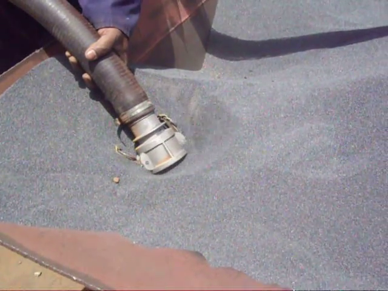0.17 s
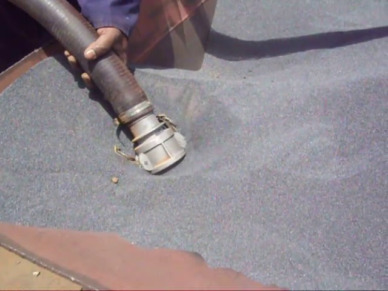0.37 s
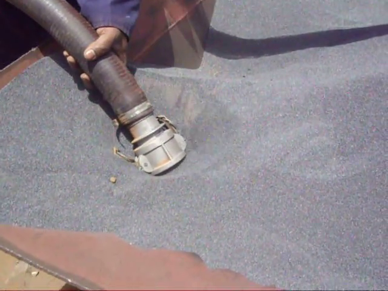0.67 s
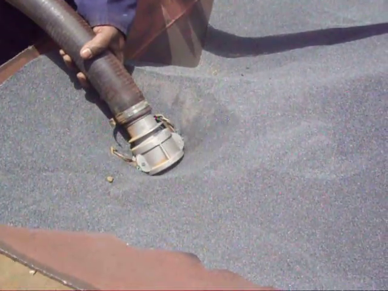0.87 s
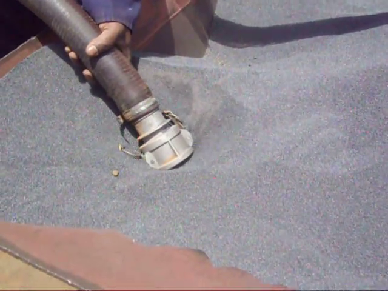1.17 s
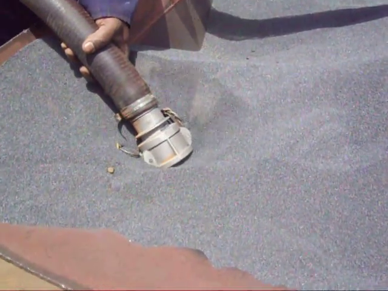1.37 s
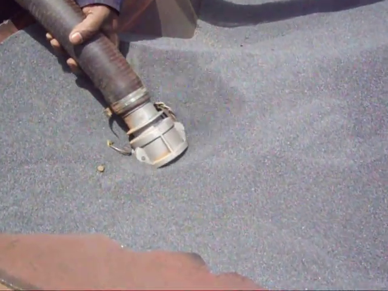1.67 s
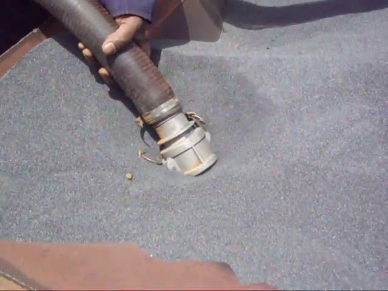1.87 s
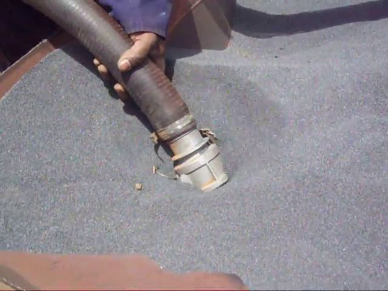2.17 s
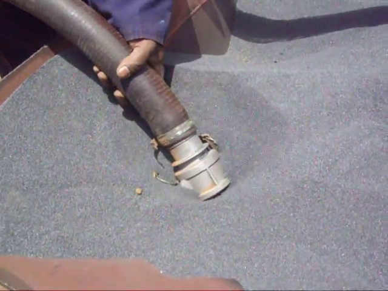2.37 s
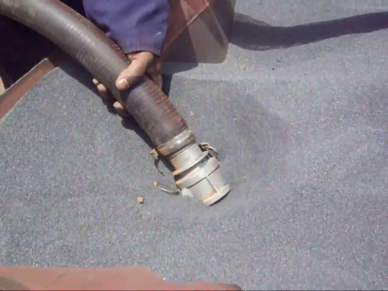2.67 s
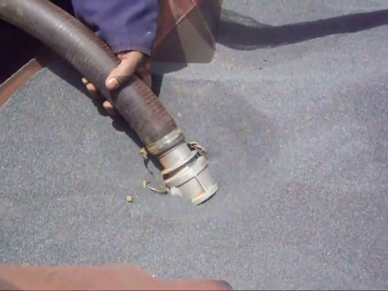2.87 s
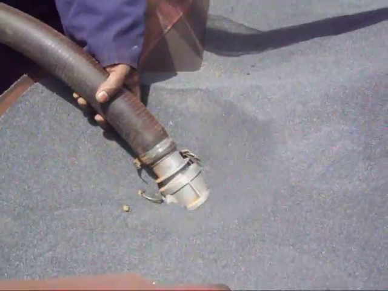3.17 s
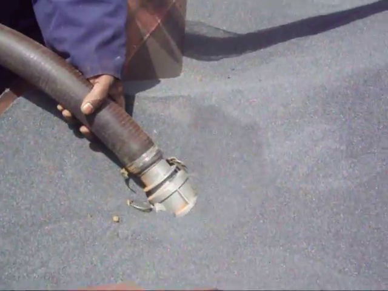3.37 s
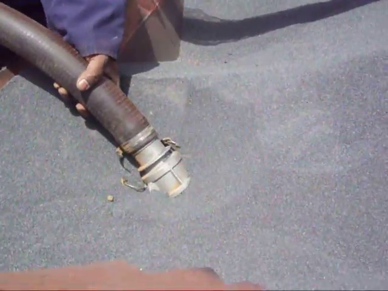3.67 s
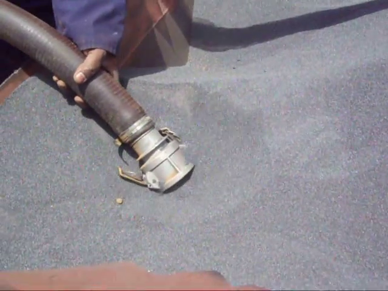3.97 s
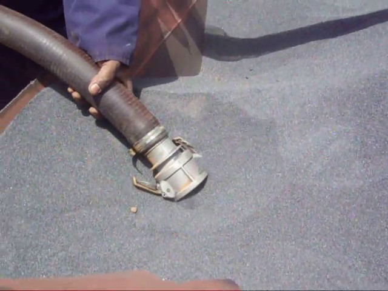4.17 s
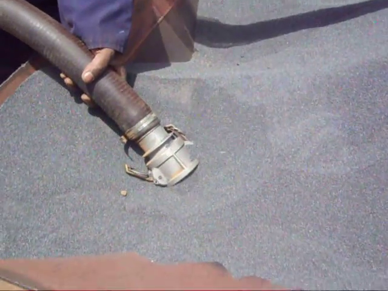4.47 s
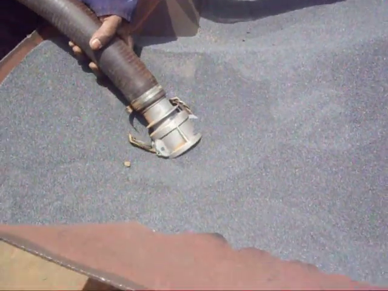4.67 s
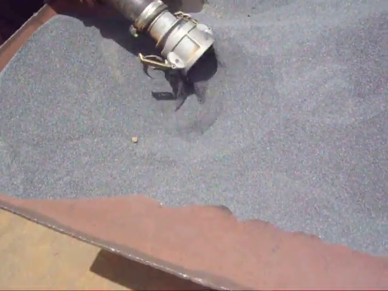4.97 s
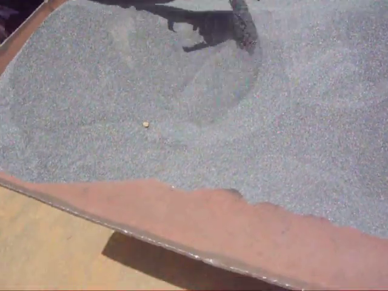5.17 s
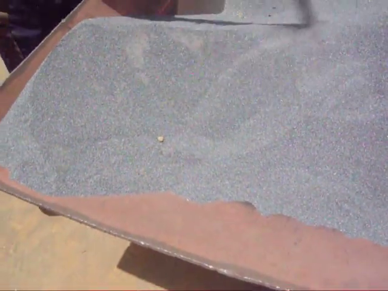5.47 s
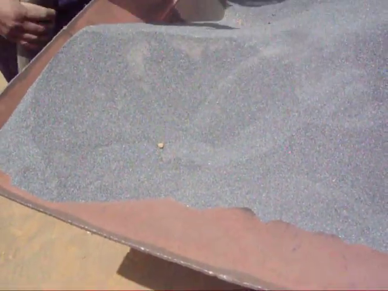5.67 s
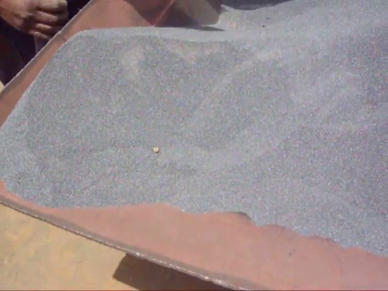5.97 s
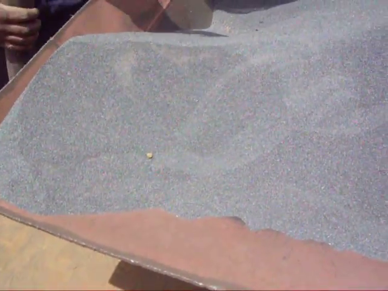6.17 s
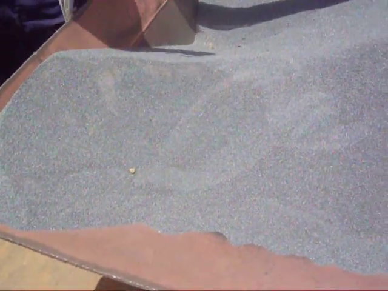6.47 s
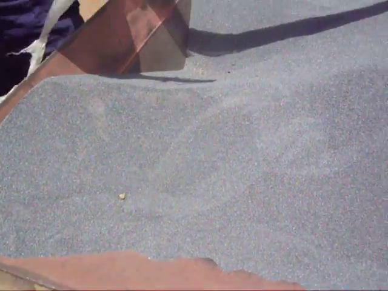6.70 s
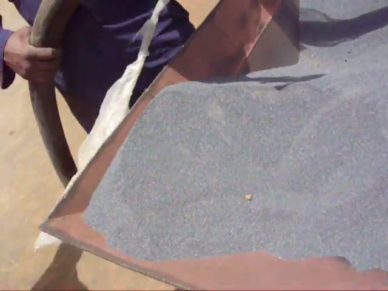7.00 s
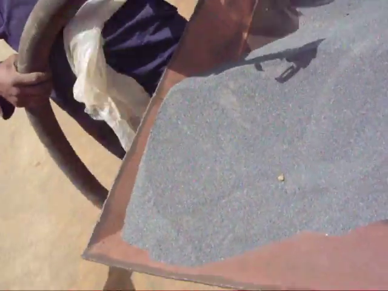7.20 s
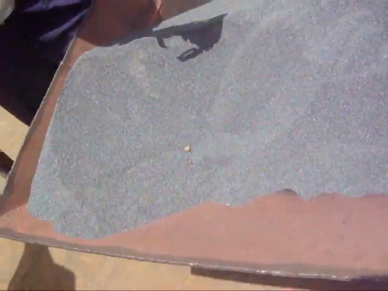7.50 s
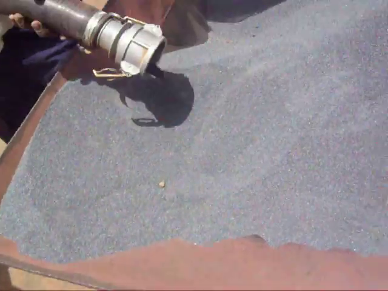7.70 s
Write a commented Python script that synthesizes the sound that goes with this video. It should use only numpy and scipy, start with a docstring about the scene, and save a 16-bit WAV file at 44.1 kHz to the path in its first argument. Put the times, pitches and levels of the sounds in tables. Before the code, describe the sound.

A steady industrial vacuum fills the whole scene: midrange air roar in the hose, sandy hiss at its metal mouth, faint short reflections from steel walls. Behind it, a lumpy exhaust drone and constant blower and fan tones barely waver. Wind gusts rumble now and then, strongest around the middle. Close, band-limited, slightly overloaded camera sound in open air.

```python
"""Grit vacuum outdoors

An industrial vacuum lifts fine blasting grit out of a steel skip: filtered noise roars and hisses.
A diesel engine drives its lobe blower and cooling fan at nearly constant speed: steady tones and a drone.
Wind buffets the microphone of a small narrow-band camera, and the highest peaks are clipped."""
import sys
import numpy as np
from scipy import signal
from scipy.fft import rfft, irfft, next_fast_len
from scipy.io import wavfile

SR = 44100
rng = np.random.default_rng(int(sys.argv[2]) if len(sys.argv) > 2 else 0)


def materialize(psi):
    """Save the field psi as 16-bit PCM at rate SR to the path in sys.argv[1].

    A 1-D psi becomes a single channel; in a 2-D psi each row is a channel.
    """
    bounded = np.clip(np.atleast_2d(psi).T, -1, 1)
    quanta = np.round(bounded * 32767).astype(np.int16)
    wavfile.write(sys.argv[1], SR, quanta)


N = 345725  # length [samples]


def from_db(db):
    """Turn decibels into a plain multiplier."""
    return 10 ** (np.asarray(db) / 20)


def rms_one(x):
    """Scale a sound to an average strength (rms) of 1."""
    return x / np.sqrt(np.mean(x ** 2) + 1e-20)


def bell(peak_s, half_s):
    """A smooth rise to 1 at peak_s and an equal fall, down to 37 % after half_s."""
    t = np.arange(N) / SR
    return np.exp(-((t - peak_s) / half_s) ** 2)


def drift(rate_hz):
    """Slow random wandering of spread 1: noise smoothed twice by a one-pole low-pass."""
    step = 40  # samples between computed points; straight lines fill the gaps
    pole = np.exp(-2 * np.pi * rate_hz * step / SR)
    noise = rng.standard_normal(N // step + 2002)
    slow = signal.lfilter([1], [1, -2 * pole, pole * pole], noise)[2000:]  # skip the filter's start
    return np.interp(np.arange(N) / step, np.arange(len(slow)), rms_one(slow))


def coloured(x, spectrum):
    """Shape the pitch balance with straight lines between the spectrum's points, on a log-frequency axis."""
    size = next_fast_len(N)
    hz, db = np.transpose(spectrum)
    bins_hz = np.maximum(np.fft.rfftfreq(size, 1 / SR), 1)
    gain = from_db(np.interp(np.log(bins_hz), np.log(hz), db))
    return irfft(rfft(x, size) * gain, size)[:N]


def turbulence(spectrum):
    """Churning air: coloured noise of rms 1."""
    return rms_one(coloured(rng.standard_normal(N), spectrum))


# balance of the air roaring in the hose: (frequency [Hz], relative level [dB])
HOSE_ROAR = [(250, -9), (400, -3.5), (455, -2), (545, 0), (650, -2), (810, -6), (900, -3.5), (1100, -5),
             (1330, -8.5), (1520, -6.5), (1700, -10), (2600, -26.5)]
# balance of the hiss at the hose mouth: (frequency [Hz], relative level [dB])
MOUTH_HISS = [(900, -29), (1600, -9), (1900, 2.5), (2150, 2.5), (2520, 2.3), (2750, 3), (2880, 3),
              (3020, 3), (3350, 3.5), (3560, 1.5), (3720, -0.5), (4400, 0), (5000, -0.5), (6300, -8.5)]
# the roar and hiss dip and recover: (time of lowest point [s], half-length [s], roar dip [dB], hiss dip [dB])
LULLS = [(3.802, 3.0, 2.5, 1.37), (7.22, .22, 0.4, 1.3)]


def suction(grains_per_s=9000, grit_db=-5):
    """Air roars through the hose and hisses at its mouth, where countless grains tick on the coupling."""
    roar_db, hiss_db = -18.5, -19.5  # strength outside the lulls
    for low_s, half_s, roar_dip_db, hiss_dip_db in LULLS:
        lull = bell(low_s, half_s)
        roar_db = roar_db - roar_dip_db * lull
        hiss_db = hiss_db - hiss_dip_db * lull
    # each grain is a one-sample tick of random strength
    grains = (rng.random(N) < grains_per_s / SR) * rng.standard_normal(N)
    grit = from_db(grit_db) * rms_one(coloured(grains, MOUTH_HISS))  # level relative to the air hiss
    hiss = rms_one(turbulence(MOUTH_HISS) + grit)
    return from_db(roar_db) * turbulence(HOSE_ROAR) + from_db(hiss_db) * hiss


def skip_walls(x, delays_s=(.0035, .0075, .013), sway_s=0.00013, echo_db=-21):
    """The steel walls send back short echoes, whose paths change as hose and camera sway."""
    n = np.arange(N)
    echoes = np.zeros(N)
    for delay_s in delays_s:
        moving_delay_s = delay_s + sway_s * drift(0.26)
        echoes += np.interp(n - moving_delay_s * SR, n, x)
    return x + from_db(echo_db) * echoes


CRANK_HZ = 24.95  # engine turns per second


# balance of the exhaust rumble: (frequency [Hz], relative level [dB])
EXHAUST = [(45, -20), (65, -7.5), (88, -3), (112, -3), (150, 0.5), (170, -1), (195, -3), (245, -6.5),
           (285, -3), (335, -9.5), (450, -18), (700, -41.5)]
# brief swells of the drone: (time [s], extra level [dB])
SWELLS = [(0.681, 7), (1.09, 6.5), (1.764, 9.5), (2.855, 7), (4.19, 12), (5.219, 5), (6.53, 5), (7.735, 8)]


def drone(throb_db=1.08, drone_db=-15.5, swell_s=0.012, lumpy_db=0.65):
    """Lumpy exhaust rumble: noise that throbs at the crank's turning rate and swells now and then."""
    t = np.arange(N) / SR
    throb = throb_db * np.sin(2 * np.pi * CRANK_HZ * t)
    lumps = lumpy_db * drift(9.2)
    swells = sum(db * bell(s, swell_s) for s, db in SWELLS)
    return from_db(drone_db + throb + lumps + swells) * turbulence(EXHAUST)


LOBE_HZ, FAN_HZ, TURBO_HZ = 308.95, 278.5, 1398.8  # base rates of the other turning parts
# tones of each turning part: (multiple of its base rate, level before the shared trim [dB])
ENGINE = [(3, -27), (4, -25), (6, -32.5), (8, -39.5), (12, -30), (40, -43.5), (46, -39), (57, -42)]
BLOWER = [(1, -32.5), (2, -28), (3, -39), (4, -42.5), (5, -36.5), (6, -36.5), (8, -42.5)]
FAN = [(1, -30.5), (2, -37.5)]
TURBO = [(2, -42), (3, -40)]
# thin whines of the drive: (frequency [Hz], level before the shared trim [dB])
WHINES = [(1218, -40), (1607.6, -50), (1664.8, -48), (1931.3, -42.5), (2066.5, -44)]


def machine(speed_wander=0.00067, trim_db=-1.0, scatter_rad=0.27, waver_db=1.1):
    """All parts follow one governed shaft; moving air makes each tone waver in level and phase."""
    # time as the shaft feels it, a touch fast or slow; speed_wander is a fraction of the speed
    shaft_time = np.cumsum(1 + speed_wander * drift(1.28)) / SR
    parts = [(CRANK_HZ, ENGINE), (LOBE_HZ, BLOWER), (FAN_HZ, FAN), (TURBO_HZ, TURBO)]
    tones = [(base_hz * round(k), db) for base_hz, partials in parts for k, db in partials]
    tones += list(WHINES)
    out = np.zeros(N)
    for hz, db in tones:
        turns = hz * shaft_time + rng.random()  # random starting point
        phase = 2 * np.pi * turns + scatter_rad * drift(5.6)
        tone = np.sin(phase) * from_db(waver_db * drift(1.9))
        out += from_db(db + trim_db) * rms_one(tone)
    return out


# balance of the wind rumble: (frequency [Hz], relative level [dB])
WIND_RUMBLE = [(5, -28.5), (15, -0.5), (35, 5), (60, -4.5), (110, -9.5), (300, -32.5)]
# gusts on the microphone: (time of peak [s], peak level [dB], half-length [s])
GUSTS = [(1.82, -19.5, 0.27), (2.23, -17.5, 0.19), (2.843, -22, 0.072), (4.17, -15, 0.08),
         (4.676, -13, 0.15), (5.395, -23.5, 0.54), (6.807, -15, .09), (7.112, -25.5, 0.12)]


def wind(breeze_db=-33.5, swing_db=4, swing_hz=1.2):
    """A light, uneven breeze rumbles on the microphone port; each gust rises and falls on top of it."""
    breeze = from_db(breeze_db + swing_db * drift(swing_hz))
    gusts = [from_db(db) * bell(s, half_s) for s, db, half_s in GUSTS]
    strength = np.linalg.norm([breeze] + gusts, axis=0)  # adds their powers
    return strength * turbulence(WIND_RUMBLE)


def scene():
    """Suction with its echoes, exhaust, machine tones and wind meet at one microphone."""
    return (skip_walls(suction()) + drone() + machine() + wind())[None]


# camera response before the overload: (frequency [Hz], level [dB])
MICROPHONE = [(5000, 0), (5280, -1.5), (5530, -8.5), (5760, -11), (6000, -17), (6200, -39.5), (6400, -89)]
# camera response after the overload: (frequency [Hz], level [dB])
OUTPUT = [(6000, 0), (6400, -7), (11000, -4), (16000, -6)]


def record(dry):
    """The camera passes little above 5 kHz; the highest peaks are clipped flat and crackle dully."""
    narrow = coloured(dry[0], MICROPHONE)
    clipped = np.clip(narrow, -.71, .71)
    softened = coloured(clipped, OUTPUT)
    # steep low-pass at 15900 Hz
    low_pass = signal.ellip(10, .1, 80, 15900, fs=SR, output="sos")
    return signal.sosfilt(low_pass, softened)[None]


dry = scene()
out = record(dry)
materialize(out)
```